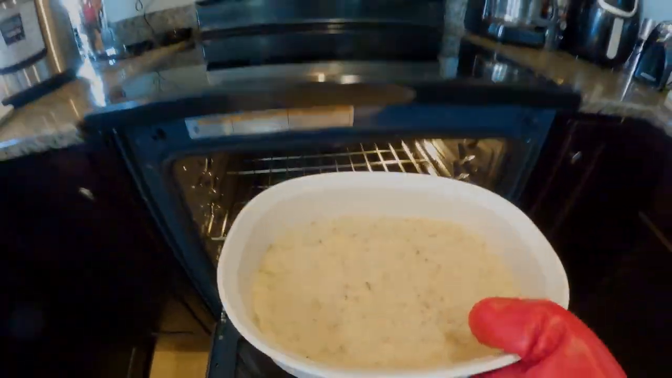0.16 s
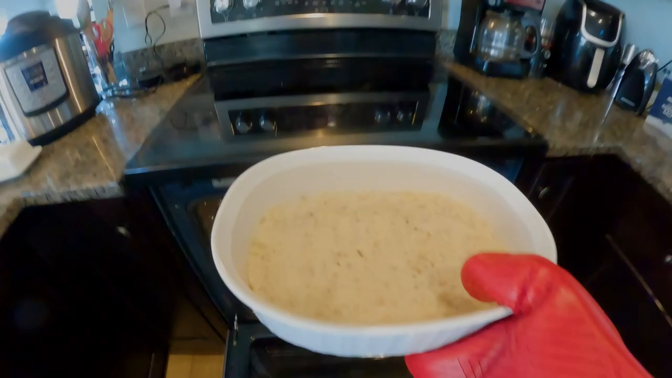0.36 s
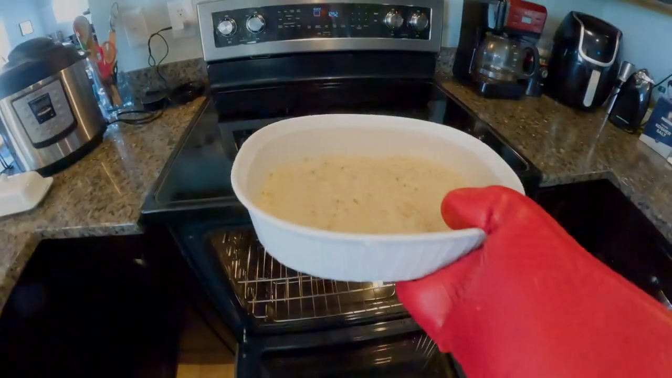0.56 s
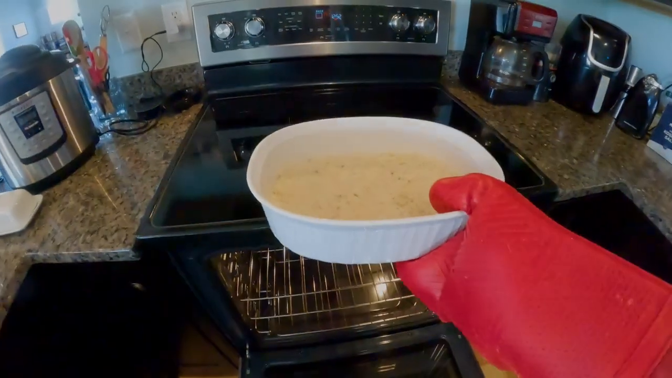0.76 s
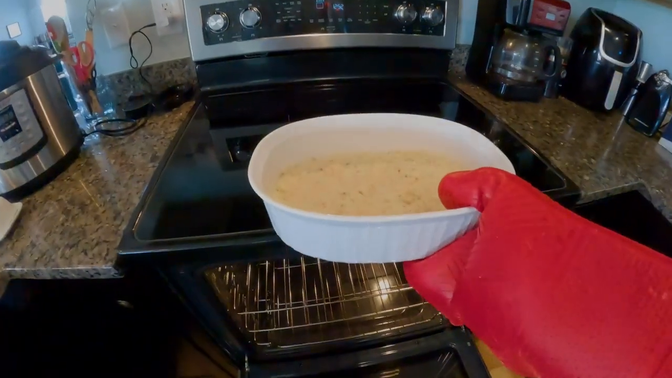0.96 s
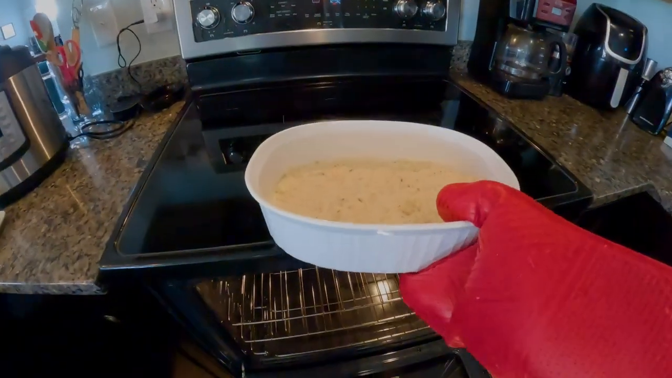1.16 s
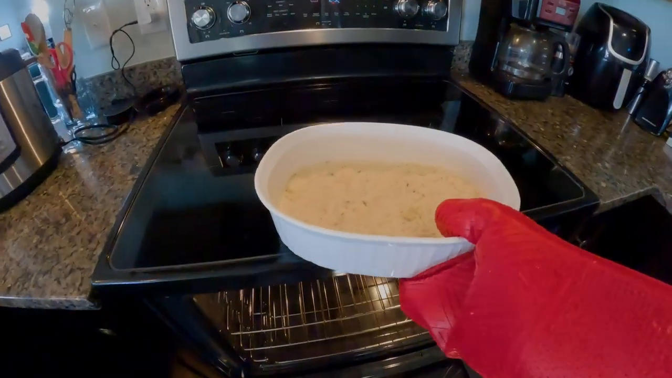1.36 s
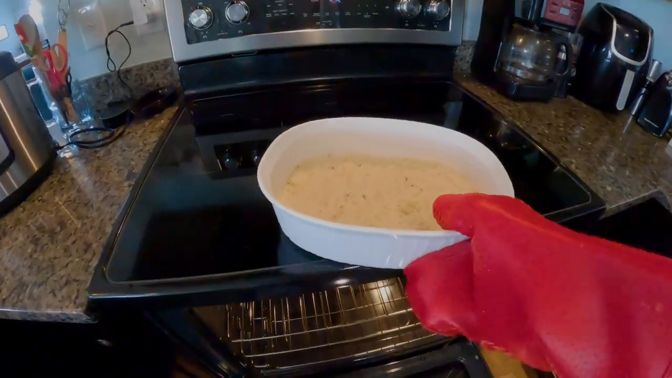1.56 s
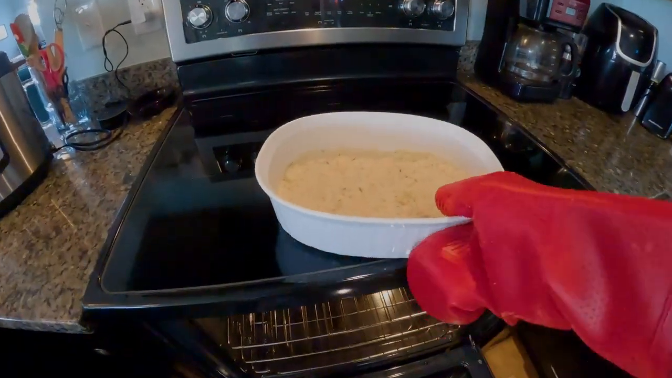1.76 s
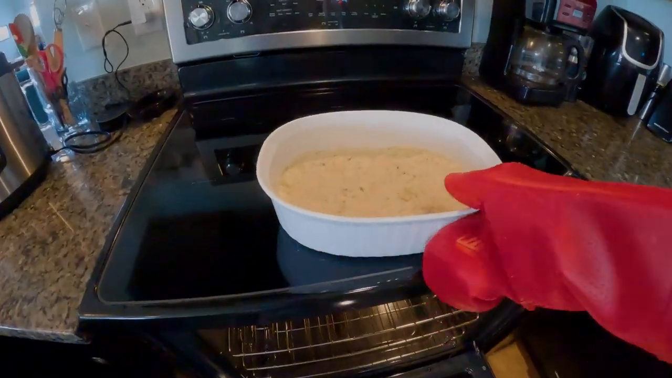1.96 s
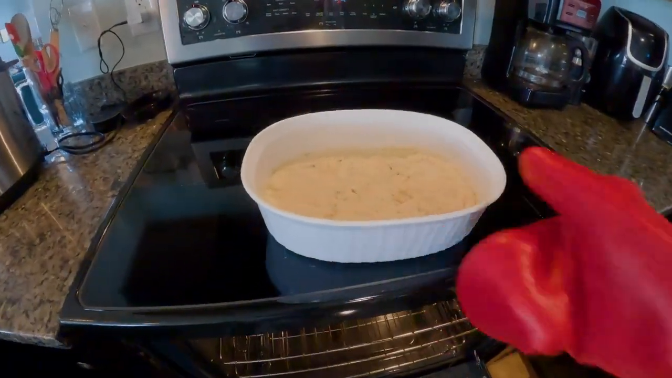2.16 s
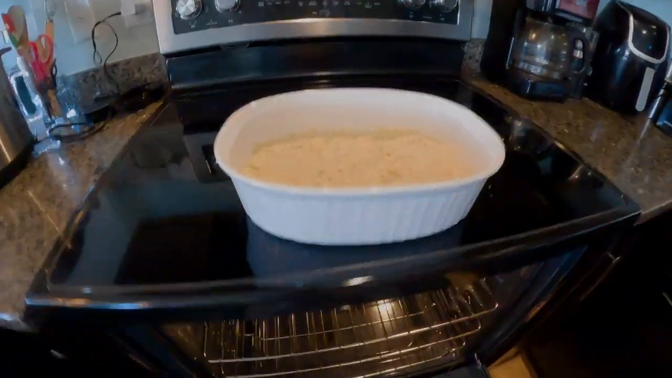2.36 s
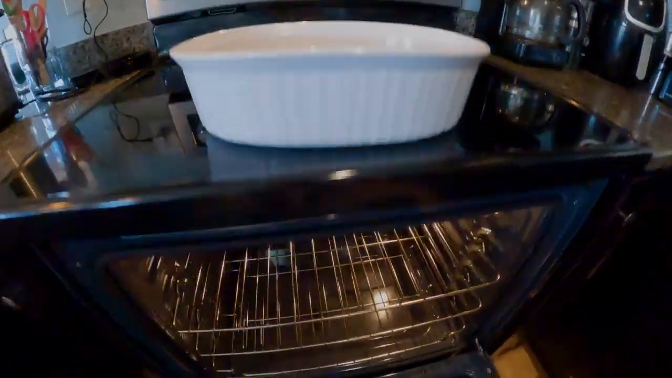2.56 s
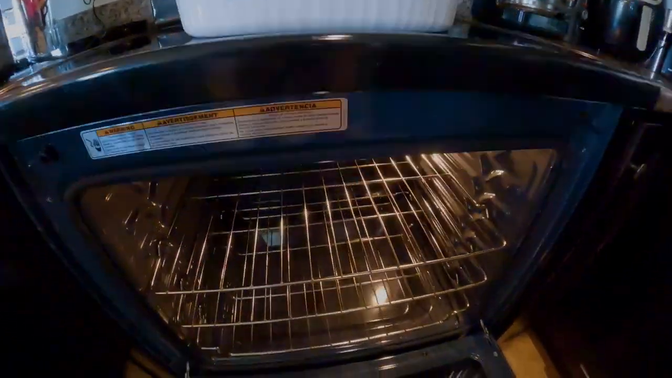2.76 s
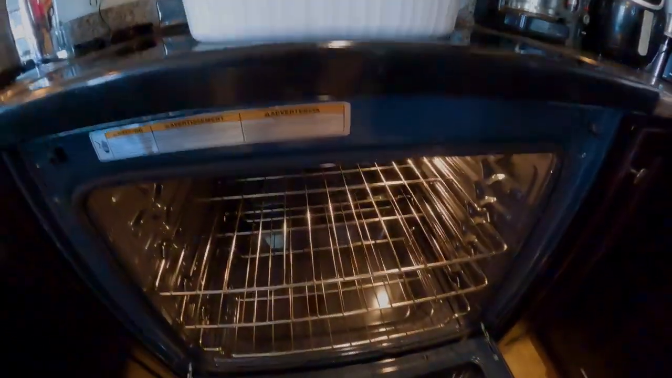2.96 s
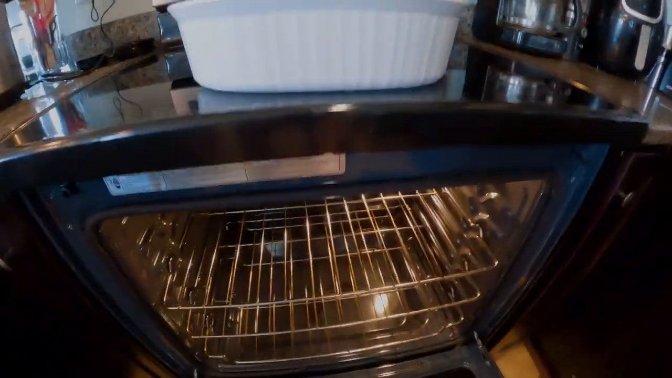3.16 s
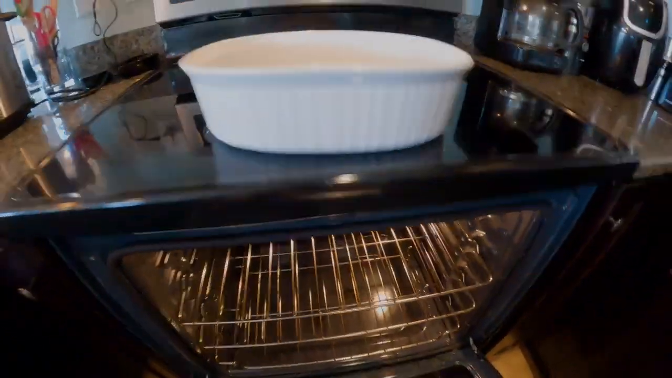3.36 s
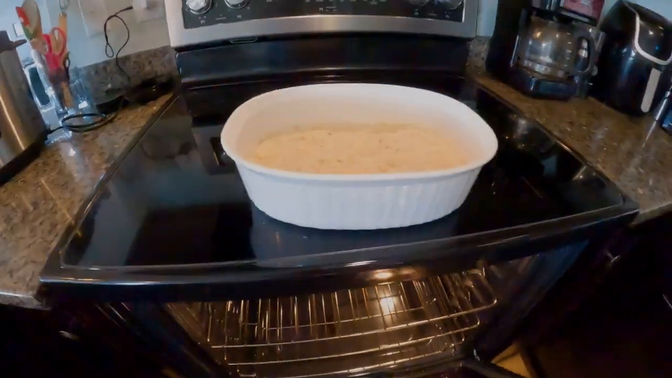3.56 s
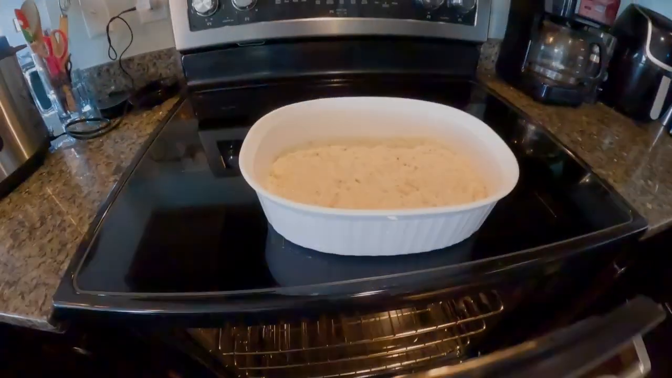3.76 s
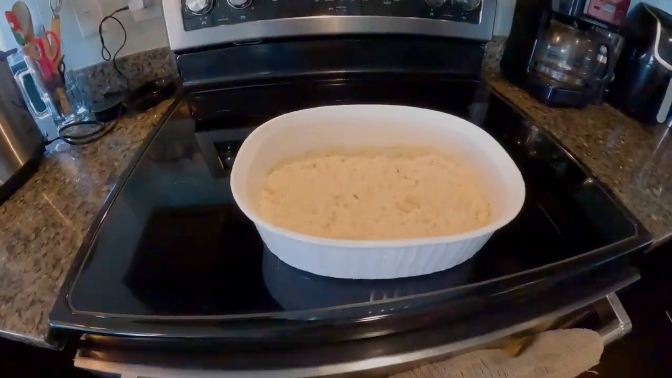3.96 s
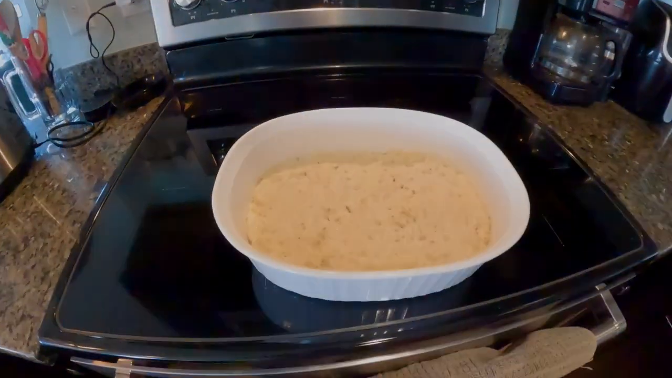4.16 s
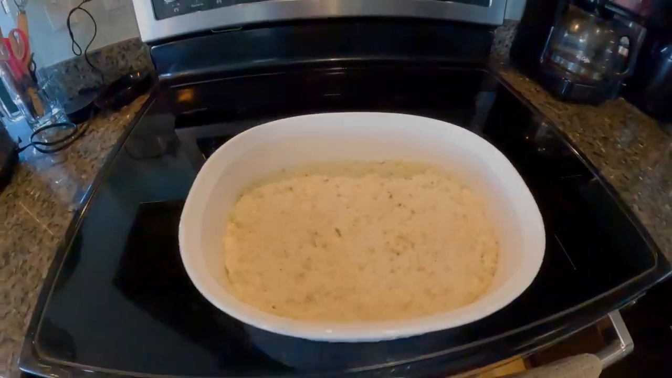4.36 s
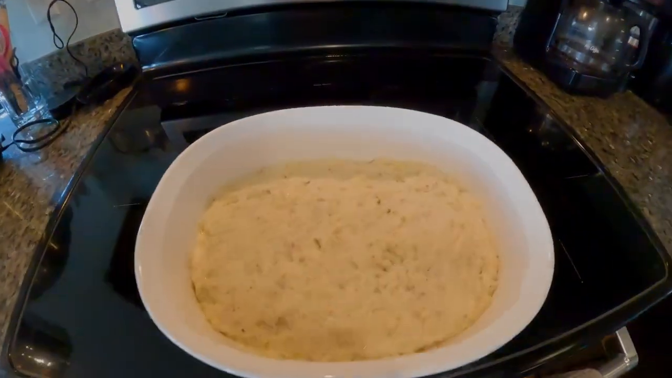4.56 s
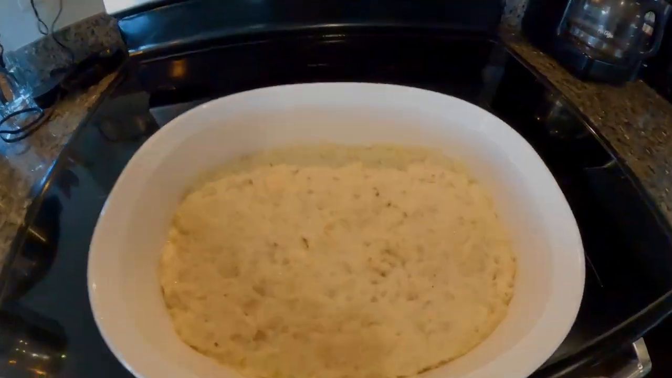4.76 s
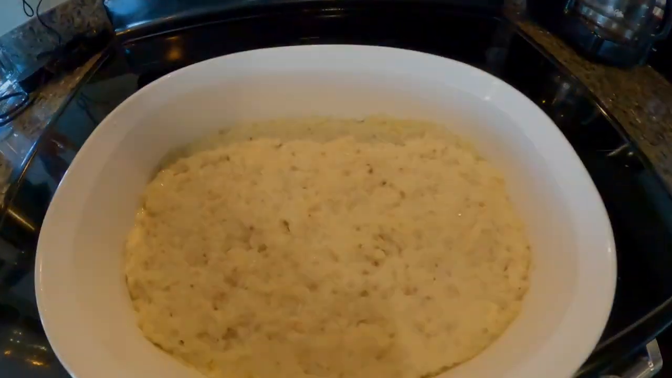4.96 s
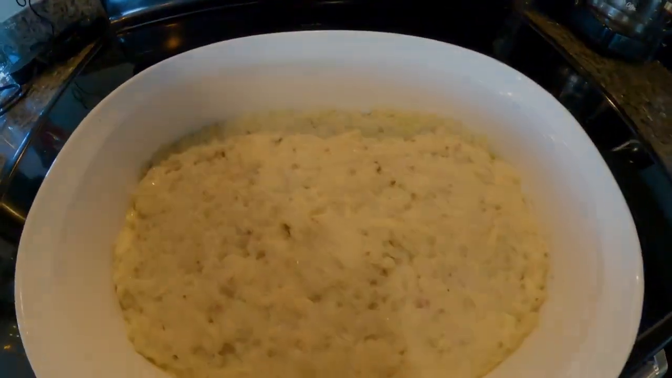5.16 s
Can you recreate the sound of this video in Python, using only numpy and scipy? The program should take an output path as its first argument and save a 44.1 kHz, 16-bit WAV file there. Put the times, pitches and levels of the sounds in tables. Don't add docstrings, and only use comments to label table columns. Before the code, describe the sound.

A ringing oven rack fades as a ceramic dish knocks sharply onto glass, slides, then an oven door clunks shut in a kitchen.

```python
import sys
import numpy as np
from scipy import signal
from scipy.fft import rfft, irfft, next_fast_len
from scipy.io import wavfile
from scipy.ndimage import map_coordinates

SR = 44100
rng = np.random.default_rng(int(sys.argv[2]) if len(sys.argv) > 2 else 0)


def volts_from_decibels(level):
    exponent = np.asarray(level, float) / 20
    return 10 ** exponent


def master(y):
    cut = np.clip(np.atleast_2d(y).T, -1, 1)
    pcm = np.round(cut * 32767)
    wavfile.write(sys.argv[1], SR, pcm.astype(np.int16))


N = 230598


def unit(x):
    return x / np.sqrt(np.mean(x ** 2) + 1e-20)


def along(points, hz):
    f, v = np.transpose(points)
    return np.interp(np.log(hz + 1), np.log(f + 1), v)


def curves(rows):
    s, *columns = np.transpose(rows)
    return [np.interp(np.arange(N) / SR, s, c) for c in columns]


def filtered(x, response):
    m = next_fast_len(x.shape[-1] + 8192)
    spectrum = rfft(x, m) * response(np.fft.rfftfreq(m, 1 / SR))
    return irfft(spectrum, m)[..., :x.shape[-1]]


def resonate(x, peaks):
    def body(f):
        total = 0
        for k, (hz, width_hz, db) in enumerate(peaks):
            damping = 1j * f * width_hz
            total = total + (-1) ** k * volts_from_decibels(db) * damping / (hz * hz - f * f + damping)
        return total
    return filtered(x, body)


def wobble(rate):
    knots = rng.standard_normal(int(N * rate / SR) + 4)
    return map_coordinates(knots, [np.arange(N) * rate / SR])


def add(track, s, sound):
    place = track[..., round(s * SR):][..., :sound.shape[-1]]
    place += sound[..., :place.shape[-1]]


# frequency in Hz, likeness 0 to 1.
PORT_LIKENESS = [(30, .8), (80, .86), (170, .98), (350, .97), (700, .95), (1400, .9), (2800, .86),
                 (5600, .9), (9000, .75), (14000, .6)]


def hiss(spectrum):
    def mid_side(hz):
        turn = np.arccos(np.clip(along(PORT_LIKENESS, hz), -1, 1)) / 2
        return volts_from_decibels(along(spectrum, hz)) * [np.cos(turn), np.sin(turn)]
    mid, side = filtered(rng.standard_normal((2, N)), mid_side)
    return unit(np.array([mid + side, mid - side]))


BEAT_PERIOD_S = {669: .8, 1462: .78, 4426: .39, 6790: .2}
RACK_S, NEIGHBOUR_GAIN = 3.2, 0.7


def rack(modes, level_db, spread, twin_db):
    track = np.zeros(N)
    for hz, db, t60 in modes:
        t = np.arange(round(min(RACK_S, t60) * SR)) / SR
        detune, start = rng.standard_normal((3, 1)), rng.random((3, 1))
        twins = np.sin(2 * np.pi * (hz * (1 + spread * detune) * t + start)).sum(axis=0)
        line = np.sin(2 * np.pi * hz * t) + volts_from_decibels(twin_db - 15 * t / t60) * twins
        if hz in BEAT_PERIOD_S:
            line -= NEIGHBOUR_GAIN * np.sin(2 * np.pi * (hz + 1 / BEAT_PERIOD_S[hz]) * t)
        sway_db = 3 * np.interp(t, np.linspace(0, RACK_S, num=40), rng.standard_normal(size=40))
        add(track, 0, volts_from_decibels(level_db + db + sway_db - 60 * t / t60) * line)
    return track


# frequency in Hz, level in dB, t60 in s.
RACK_LOW = [(190, -42, .7), (205, -47, .7), (232, -49, 3.5), (254, -50, 3.0), (404, -49, 1.0),
            (621, -51, 1.6), (644, -58, 2.5), (669, -50, 4.5), (740, -62, 3.0), (894, -53, .6),
            (1120, -56, 1.2), (1275, -56, 2.5), (1303, -52, 4.0), (1462, -56, 5.0)]
RACK_MID = [(1667, -62, 2.0), (2110, -59, 1.8), (3155, -60, 1.1), (3693, -60, .9), (4426, -50, 1.2),
            (4949, -56, 1.0), (5043, -51, 1.1), (5700, -59, 1.1), (5861, -53, 1.1), (6621, -59, 1.3),
            (6790, -57, 1.4), (6912, -59, 1.3), (7337, -50, 1.2), (7345, -68, 4.5)]
RACK_TOP = [(8479, -18, 1.3), (8753, -16, .6), (9205, -14, 1.0), (9500, -10, 1.1), (9695, -17, 1.0),
            (10640, -22, 1.0), (11000, -20, .7), (11550, -8, 1.3), (11700, -12, 1.3), (12300, -16, 1.0),
            (12460, -13, 1.2), (13360, -22, .5), (13810, -20, .5)]


def ringing_racks():
    low = rack(RACK_LOW, level_db=3.0, spread=0.008, twin_db=-5.0)
    mid = rack(RACK_MID, level_db=1.5, spread=0.0045, twin_db=-5)
    top = rack(RACK_TOP, level_db=-59.5, spread=0.0023, twin_db=-8.0)
    return low + mid + top


# time in s, level in dB.
SWAY = [(0.0, -38), (0.45, -43.5), (1.34, -37), (1.39, -25), (1.5, -45.5), (2.32, -37), (2.43, -42),
        (3.04, -35), (3.18, -41), (3.26, -39), (3.92, -33), (4.25, -34), (4.44, -27.5), (4.59, -27.5),
        (4.65, -35), (4.91, -28.5), (5.14, -43), (5.23, -28)]
# frequency in Hz, level in dB per Hz.
RUMBLE = [(8.8, -26.5), (15, 1.5), (40, -8), (62, -13.5), (81, -56.5), (140, -120)]


def handling_rumble():
    sway_db, = curves(SWAY)
    return volts_from_decibels(sway_db) * hiss(RUMBLE)


# time of full pressure in s, hold in s, scrape in dB,
# weight over it in dB, fine grain over it in dB.
DRAGS = [(0.0, 0.018, -30, -9.5, -11.5), (.2, 0.2, -46, 1.5, -12), (.63, 0.21, -51.5, -8, -11),
         (1.5, 0.036, -33.5, -5, -10), (1.691, 0.13, -37.5, -4, -20.5), (2.1, 0.011, -52.5, 2.5, -6),
         (2.619, 0.33, -65, -15, -6.5), (3.2, 0.099, -54, 10, -6), (3.45, 0.13, -49, -4, -17.5),
         (3.822, 0.14, -47.5, 13.5, -5), (4.12, 0.035, -49, 8, -13), (4.22, 0.035, -42.5, 4.5, -7),
         (4.34, 0.026, -53.5, 12, -9), (4.5, 0.087, -65.5, 20.5, 0), (4.949, 0.37, -70.5, 15.5, -3.5)]
PRESS_DB_PER_S, EASE_DB_PER_S = 173, 72


def drags():
    s, held, db, weight_db, grain_db = np.transpose(DRAGS)[:, :, None]
    t = np.arange(0, N, 64) / SR
    build_db = PRESS_DB_PER_S * np.maximum(s - t, 0)
    ease_db = EASE_DB_PER_S * np.maximum(t - s - held, 0)
    press_db = db - build_db - ease_db
    gains = []
    for over_db in (0, weight_db, grain_db):
        power = np.sum(volts_from_decibels(2 * (press_db + over_db)), axis=0)
        gains.append(np.interp(np.arange(N) / SR, t, np.sqrt(power)))
    return gains


# frequency in Hz, level in dB per Hz.
BODY = [(35, -29), (60, -0.5), (65, -1.5), (146, -3.5), (241, -11), (380, -23), (490, -21.5), (840, -120)]


def moved_weight(gain, shake):
    return (gain + volts_from_decibels(-55.5)) * volts_from_decibels(-0.5 + 2.2 * shake) * hiss(BODY)


# frequency in Hz, level in dB per Hz.
SCRAPE = [(190, -24.5), (320, -5), (472, -5), (689, 2), (851, -8.5), (1360, -3.5), (2400, -16.5),
          (3120, -54), (5280, -120)]


def slide(gain, shake):
    return (gain + volts_from_decibels(-67.5)) * volts_from_decibels(-5.5 + 0.82 * shake + 0.93 * wobble(90)) * hiss(SCRAPE)


# time in s, level in dB.
SLEEVE = [(0.0, -67), (.2, -79), (.45, -83), (.53, -93), (.62, -80.5), (1.4, -83.5), (1.52, -71),
          (2.13, -72.5), (2.39, -86.5), (2.81, -70.5), (3.0, -75.5), (3.8, -70.5), (3.95, -85.5),
          (4.37, -77.5), (4.48, -74.5), (4.6, -76), (4.9, -75.5), (5.05, -85), (5.23, -89.5)]
# frequency in Hz, level in dB per Hz.
RUSTLE = [(1180, -28.5), (2000, -0.5), (2310, -0.5), (3760, 0), (4610, -3), (7080, -3), (8000, -25.5),
          (10400, -40.5), (17600, -120)]
SHEEN = [(4590, -31.5), (7800, -8.5), (8240, -18), (9430, -19), (10900, -16), (12200, -16.5), (13400, -28),
         (15500, -47)]


def cloth(grain, shake):
    sleeve_db, = curves(SLEEVE)
    fibres_db = 0.5 * shake + 1.2 * wobble(150)
    rustle = (grain + volts_from_decibels(sleeve_db + 9.5)) * volts_from_decibels(fibres_db - 4.0) * hiss(RUSTLE)
    return rustle + volts_from_decibels(sleeve_db - 1.5 + fibres_db) * hiss(SHEEN)


def movement():
    scrape, weight, grain = drags()
    shake = wobble(25.066)
    return handling_rumble() + moved_weight(weight, shake) + slide(scrape, shake) + cloth(grain, shake)


# time in s, level in dB, sheen in dB, pitch in Hz.
TICKS = [(0.3494, -50, -67, 4500), (0.4155, -46, -63, 7200), (0.4394, -45, -68, 7400),
         (0.61, -39, -60, 4300), (0.6694, -46, -62, 5010), (0.72, -47, -67, 7460), (0.7694, -47, -69, 4400),
         (0.84, -45, -86, 5440), (0.8814, -46, -82, 7300), (0.9286, -55, -65, 7450), (1.03, -44, -60, 6990),
         (1.051, -53, -78, 7240), (1.0894, -57, -63.5, 4254), (1.779, -54, -45, 5210),
         (1.827, -34.5, -43.5, 4300), (1.8355, -50.5, -61.5, 7400)]


def mitt():
    t = np.arange(SR // 20) / SR
    fall = volts_from_decibels(-60 * t / 0.032) * (1 - np.exp(-t / 0.0019))
    bursts, tones = np.zeros((2, N)), np.zeros(N)
    for s, db, sheen_db, hz in TICKS:
        add(bursts, s, volts_from_decibels([[db - 11.0], [sheen_db]]) * fall)
        add(tones, s, volts_from_decibels(db - 14) * fall * np.sin(2 * np.pi * hz * t))
    return bursts[0] * hiss(RUSTLE) + bursts[1] * hiss(SHEEN) + tones


# frequency in Hz, level in dB per Hz.
CRACK = [(1060, -25), (1800, 0.5), (2080, -4), (2510, -2), (3640, -4), (4420, -4), (7240, -9), (8000, -31),
         (10400, -42), (17600, -120)]
CLACK = [(180, -42.5), (300, -1), (1130, 0), (1630, 0), (1860, -18), (2200, -14), (2860, -36), (4840, -120)]


def contact_colours():
    return [hiss(CRACK), hiss(SHEEN), hiss(CLACK)]


def ring(modes, t, scatter_db, attack):
    hz, db, t60 = np.transpose(modes)[:, :, None]
    strength_db = db + scatter_db * rng.standard_normal(hz.shape)
    waves = volts_from_decibels(strength_db - 60 * t / t60) * np.sin(2 * np.pi * hz * t)
    return waves.sum(axis=0) * (1 - np.exp(-t / attack)) / np.sqrt(np.sum(volts_from_decibels(2 * db)))


def knocks(hits, colours, shell, slab, rise, click_db, burst_t60, tail_t60, thud_rise, ring_db,
           grit_db, sheen_db):
    t = np.arange(SR // 2) / SR
    bursts, thuds = np.zeros((3, N)), np.zeros(N)
    fade = [[1], [1.15], [1]]
    for s, crack_db, clack_db, thud_db, tail_db in hits:
        click = volts_from_decibels(click_db - 60 * t / 0.0051)
        fall = click + volts_from_decibels(-60 * t / burst_t60) + volts_from_decibels(tail_db - 60 * t / tail_t60)
        levels = volts_from_decibels([[crack_db - 11.5], [crack_db + sheen_db], [clack_db - 5.5]])
        add(bursts, s, levels * fall ** fade * (1 - np.exp(-t / rise)))
        add(thuds, s, volts_from_decibels(thud_db - 3.5) * ring(slab, t, scatter_db=6.0, attack=thud_rise))
    crack, sheen, clack = bursts * volts_from_decibels(grit_db * wobble(300))
    contact = crack * colours[0] + clack * colours[2]
    return contact + sheen * colours[1] + volts_from_decibels(ring_db) * resonate(contact, shell) + thuds


# time in s, crack in dB, clack in dB, thud in dB, scrape tail in dB.
DISH_HITS = [(1.3368, -43, -49, -39, -1), (1.3476, -34, -32, -41, -6.5), (1.3586, -4.5, -12.5, -44, -12),
             (1.5415, -26, -22.5, -58, -17), (1.5619, -13, -24.5, -29, -33),
             (1.5684, -26, -23, -53.5, -7.5), (1.9321, -30, -23, -39, -31),
             (1.9384, -11.5, -26, -26.5, -17), (1.9466, -13, -28, -23, -28.5),
             (1.9562, -39, -29.5, -28, -34.5), (2.1457, -54, -34.5, -37.5, -43),
             (2.1664, -57, -35.5, -36.5, -31)]
# frequency in Hz, width in Hz, level in dB.
CERAMIC = [(285, 50, -5), (370, 40, -2), (554, 35, -2), (700, 45, -2), (1160, 40, -3), (1534, 35, -5),
           (1836, 50, -5), (2495, 40, -5), (2670, 40, -4), (3440, 45, -5)]
# frequency in Hz, level in dB, t60 in s.
GLASS = [(93, -3, 0.36), (119.3, -11, 0.69), (153, -7, 0.54), (190.8, -5.5, 0.4), (265, -3, 0.12)]


def dish_knocks(colours):
    return knocks(DISH_HITS, colours, CERAMIC, GLASS, rise=0.00028, click_db=-5.0, burst_t60=0.057,
                  tail_t60=0.56, thud_rise=0.0011, ring_db=9, grit_db=0.03, sheen_db=-31.5)


def struck(rows):
    track = np.zeros(N)
    for s, db, hz, t60 in rows:
        t = np.arange(round(min(1, t60) * SR)) / SR
        attack = 1 - np.exp(-t * hz / 0.17)
        add(track, s, volts_from_decibels(db - 60 * t / t60) * np.sin(2 * np.pi * hz * t) * attack)
    return track


# time in s, level in dB, frequency in Hz, t60 in s.
DISH_NOTES = [(1.337, -38, 3900, .012), (1.348, -28, 3500, .015), (1.3586, -5, 3300, .004),
              (1.3599, -3, 3900, .005), (1.3585, -24, 598, .07), (1.3593, -22, 1160, .08),
              (1.3582, -24, 1535, .08), (1.3585, -22, 1906, .08), (1.3585, -25, 2205, .08),
              (1.3585, -24, 2480, .08), (1.383, -30, 366, .1), (1.384, -34, 727, .1),
              (1.385, -32, 1836, .1), (1.3915, -29, 1168, .1), (1.406, -30, 2670, .12),
              (1.4547, -33, 1152, .13), (1.47, -35, 2480, .12), (1.5405, -26, 575, .05),
              (1.541, -28, 738, .05), (1.5412, -29, 1095, .05), (1.5618, -19, 479, .035),
              (1.5626, -21, 3140, .045), (1.568, -31, 382, .09), (1.5688, -20, 711, .1),
              (1.569, -29, 1701, .08), (1.5701, -29, 1028, .09), (1.572, -32, 3410, .09),
              (1.9374, -24, 285, .06), (1.938, -29, 791, .07), (1.9382, -30, 1362, .08),
              (1.9384, -29, 1572, .08), (1.9386, -26, 1805, .08), (1.947, -29, 3284, .06),
              (2.1155, -43, 2433, .08), (2.1215, -40, 2143, .09), (2.1274, -41, 3325, .08),
              (2.1448, -37, 673, .05)]


def dish_notes():
    return struck(DISH_NOTES)


# time in s, level in dB.
GLIDE = [(1.35, -110), (1.45, -43), (1.56, -36.5), (1.72, -54), (1.83, -51), (1.88, -60), (2.0, -110)]
# frequency in Hz, level in dB.
GLAZE = [(1200, -30), (2000, 0.5), (3500, -3), (4300, -13.5), (8000, -58.5)]
# frequency in Hz, width in Hz, level in dB.
FOOT = [(1155, 45, -2), (1830, 60, -4), (2130, 80, -1), (2680, 50, -2), (3330, 60, 1), (4320, 50, -2),
        (4710, 60, -1), (5720, 90, -3), (7240, 60, -2)]


def glide():
    level_db, = curves(GLIDE)
    rough = hiss(GLAZE) * volts_from_decibels(3 * wobble(400))
    grit = filtered(rough, lambda hz: volts_from_decibels(along(GLAZE, hz) / 2))
    return volts_from_decibels(level_db + 3.4 * wobble(30)) * unit(grit + resonate(grit, FOOT))


# time in s, level in dB, frequency in Hz, t60 in s.
BOOMS = [(1.3622, -4.5, 153, 0.076), (1.3885, -17, 139, 0.08), (1.414, -14, 135, 0.046),
         (1.5672, -18, 142, 0.2), (1.5742, -36, 142, 0.14), (1.5812, -19.5, 139.4, 0.13),
         (1.9424, -10.5, 155, 0.035), (1.9489, -15, 149, 0.088), (1.9554, -24, 154.2, 0.035),
         (2.207, -20.5, 74, 0.061), (2.3, -18, 62, 0.072), (2.272, -60.5, 671, 1.3),
         (3.229, -37.5, 1440, 0.26), (3.799, -29, 128, 0.17), (3.74, -40, 150, 0.1),
         (3.775, -36, 168, 0.05), (3.8185, -13, 143, 0.051), (3.874, -17, 155, 0.077),
         (3.8803, -11.5, 171, 0.061), (3.8863, -15, 166, 0.027), (3.9005, -17.5, 150, 0.06),
         (3.921, -25, 70, 0.072), (3.954, -23, 110, 0.05), (4.134, -14, 31.36, 0.3),
         (4.183, -11, 28.5, 0.68), (4.372, -14, 60.4, 0.13), (4.401, -21.5, 64, 0.26),
         (4.188, -17, 110, 0.058), (4.452, -15, 54.4, 0.093), (4.519, -21.5, 56.9, 0.63),
         (4.771, -20.5, 105, 0.075), (4.369, -28.5, 610, 0.017), (4.52, -42, 644, 0.037),
         (4.7705, -34.5, 535, 0.022)]


def booms_and_air():
    return struck(BOOMS)


# time in s, crack in dB, clack in dB, thud in dB, tail in dB.
RUBS = [(1.404, -25, -30, -23.5, -22.5), (1.4505, -20.5, -27, -44, -5), (2.0005, -27, -26, -33, -15),
        (2.0444, -22.5, -43, -50, -31), (2.1114, -22.5, -33, -46.5, -16), (2.1195, -31, -39, -49.5, -26),
        (2.13, -41, -47, -50.5, -28), (2.1981, -64, -39, -48.5, -30), (3.6007, -38, -45, -64, -3.5),
        (3.714, -27, -38, -68.5, -20), (4.797, -36, -42.5, -36.5, -4.5), (4.815, -46, -56, -47, -18)]


def rubs(colours):
    return knocks(RUBS, colours, FOOT, GLASS, rise=0.017, click_db=1.5, burst_t60=0.074,
                  tail_t60=0.36, thud_rise=0.02, ring_db=1, grit_db=1.5, sheen_db=-28.0)


# time in s, crack in dB, clack in dB, thud in dB, tail in dB.
TAPS = [(4.0564, -35, -31, -39, -5), (4.0863, -40, -28, -47, -0.5), (4.1281, -40, -24.5, -28, -31),
        (4.3692, -52, -31, -22, -20), (4.4894, -47, -34, -30, -32), (4.575, -42, -58, -39, 3),
        (2.2577, -40, -68, -50.5, -2), (2.333, -43, -72, -52, -6.5), (2.1205, -27, -52, -62, -10.5),
        (4.112, -43, -34, -40, -19), (4.521, -51.5, -38, -44.5, -23), (4.669, -51, -64.5, -53.5, -16),
        (5.05, -54, -61.5, -52, -18), (4.597, -32, -47, -48.5, -8), (4.835, -35, -35.5, -43.5, -8),
        (5.105, -51, -41, -58, -28)]
# frequency in Hz, width in Hz, level in dB.
PANEL = [(560, 140, -4), (797, 77, 7), (984, 34, 4), (1200, 31, 6.5), (1304, 10, -29), (1610, 45, -3.5),
         (2740, 11, -37), (4450, 120, 7), (7420, 200, 7)]
# frequency in Hz, level in dB, t60 in s.
BOX = [(67.4, -4.5, 0.42), (105, -10.5, 0.63), (150, -1, 0.165), (201.5, 0.5, 0.1), (278, -11, 0.1)]


def taps(colours):
    return knocks(TAPS, colours, PANEL, BOX, rise=0.002, click_db=4.0, burst_t60=0.0092,
                  tail_t60=0.078, thud_rise=0.0084, ring_db=1.0, grit_db=2.5, sheen_db=-23.5)


# time in s, frequency in Hz, level
# in dB.
WIRE = [(2.45, 1240, -82), (2.736, 1293, -63.5), (2.83, 1285, -84), (2.844, 1290, -69.5), (3.1, 1253, -89)]


def wire():
    hz, db = curves(WIRE)
    t = np.arange(N) / SR
    sounding = (t > WIRE[0][0]) & (t < WIRE[-1][0])
    waver = 1.1 * wobble(40)
    level = volts_from_decibels(db + 3.5 + 6.8 * wobble(38.0))
    return sounding * level * np.sin(2 * np.pi * np.cumsum(hz) / SR + waver)


# time in s, crack in dB, clack in dB, thud in dB, tail in dB.
DOOR_HITS = [(3.1275, -62.5, -54.5, -35, 18), (3.1408, -21, -32, -17.5, -15.5),
             (3.2194, -16, -26.5, -45, -18), (3.7907, -16, -21.5, -20, -23),
             (3.8077, -61, -30.5, -43, -2.5), (3.868, -12, -15, -11.5, -16.5),
             (3.9928, -31, -27, -37, -47.5), (4.145, -28.5, -34, -18.5, -13),
             (4.1865, -25, -26.5, -14.5, 0), (4.1933, -16, -32, -45, -17)]


def door_knocks(colours):
    return knocks(DOOR_HITS, colours, PANEL, BOX, rise=0.002, click_db=0.5, burst_t60=0.085,
                  tail_t60=0.42, thud_rise=0.012, ring_db=1, grit_db=2.47, sheen_db=-24.0)


# time in s, level in dB, frequency in Hz, t60 in s.
DOOR_NOTES = [(3.128, -38, 1141, .05), (3.141, -36, 1200, .07), (3.1433, -34, 1540, .08),
              (3.2222, -26, 684, .06), (3.2227, -34, 3047, .05), (3.232, -31, 1200, .08),
              (3.2343, -33, 791, .08), (3.792, -30, 1453, .05), (3.7925, -31, 1114, .05),
              (3.7957, -30, 355, .05), (3.8075, -29, 759, .08), (3.8129, -28, 544, .08),
              (3.869, -30, 738, .09), (3.8693, -31, 1098, .08), (3.8707, -25, 904, .1),
              (3.876, -25, 441, .1), (3.8779, -27, 1303, .09), (3.898, -32, 635, .08),
              (3.9941, -35, 980, .07), (3.9958, -34, 377, .07), (4.088, -35, 1001, .07),
              (4.0889, -33, 587, .07), (4.1894, -23, 942, .1), (4.1902, -30, 447, .08),
              (4.1945, -24, 1314, .08), (4.1952, -29, 4743, .07), (4.1976, -29, 1626, .12),
              (4.1992, -28, 678, .08), (4.215, -33, 1130, .15), (4.2254, -33, 581, .13),
              (4.24, -36, 1020, .15), (4.26, -39, 1590, .2), (4.31, -41, 640, .15),
              (4.113, -36, 2600, .008), (4.341, -36, 1500, .006), (4.3555, -39, 900, .01),
              (4.8412, -43, 318, .08)]


def door_notes():
    return struck(DOOR_NOTES)


# frequency in Hz, width in Hz, level in dB.
VENT = [(1020, 130, -3), (1720, 53, 2.5), (2270, 130, 1.5), (2550, 22, -4), (3140, 130, -7),
        (3350, 79, -9.5)]
# frequency in Hz, level in dB.
VENT_EDGE = [(500, -33.5), (900, -1.5), (3300, -2), (3700, -32)]
# time in s, level in dB.
DRAUGHT = [(4.6, -95.5), (4.9, -73), (5.1, -69), (5.23, -66.5)]


def vent():
    level_db, = curves(DRAUGHT)
    return volts_from_decibels(level_db + 2 * wobble(16)) * unit(resonate(hiss(VENT_EDGE), VENT))


# frequency in Hz, t60 in s.
KITCHEN = [(100, 0.6), (2000, 0.22), (13000, 0.53)]


def kitchen(x):
    hz, t, z = signal.stft(rng.standard_normal((2, SR // 2)), SR, nperseg=256)
    decay = volts_from_decibels(-60 * t / along(KITCHEN, hz)[:, None])
    tail = signal.istft(z * decay, SR, nperseg=256)[1]
    late = np.pad(x.mean(axis=0), (150, 0))[None]
    return signal.fftconvolve(late, tail / np.linalg.norm(tail[0]), axes=1)[:, :N]


def scene():
    colours = contact_colours()
    dish = dish_knocks(colours) + dish_notes() + rubs(colours)
    door = door_knocks(colours) + door_notes() + taps(colours)
    near = ringing_racks() + mitt() + dish + wire() + door
    room = volts_from_decibels(-17.5) * kitchen(near)
    return near + room + movement() + glide() + booms_and_air() + vent()


def top_cut(x):
    return signal.sosfilt(signal.butter(12, 15680, fs=SR, output="sos"), x)


# frequency in Hz, left minus right in dB.
PORT_LEAN = [(60, -.5), (180, -1.5), (550, -0.65), (1650, 1.5), (4970, -1), (15000, 5.5)]
# frequency in Hz, left lead in radians.
PORT_LEAD = [(250, 0), (550, -.05), (1200, -.34), (2300, -.47), (4600, -.36), (7000, -.14), (9500, 0)]
# time in s, left minus right in dB.
TURN = [(0, 0.5), (3.7, 1), (4.3, -0.9), (5.23, -0.6)]


def record(dry):
    half = np.array([[.5], [-.5]])

    def ports(hz):
        return volts_from_decibels(along(PORT_LEAN, hz) * half) * np.exp(1j * along(PORT_LEAD, hz) * half)
    mix = filtered(dry, ports) * volts_from_decibels(curves(TURN)[0] * half)
    return top_cut(mix)


dry = scene()
out = record(dry)
master(out)
```